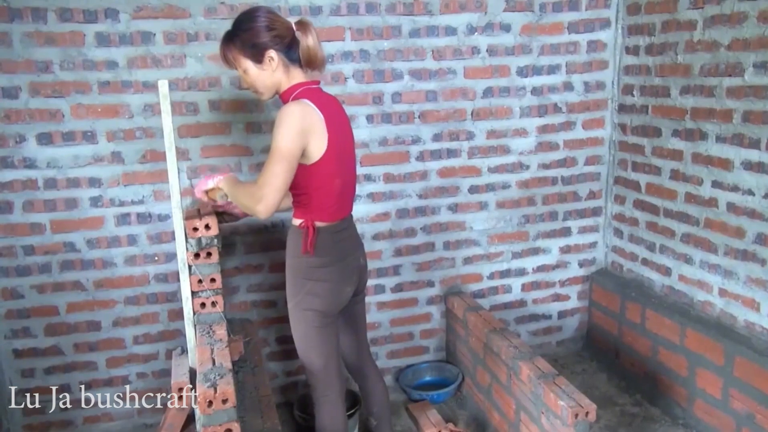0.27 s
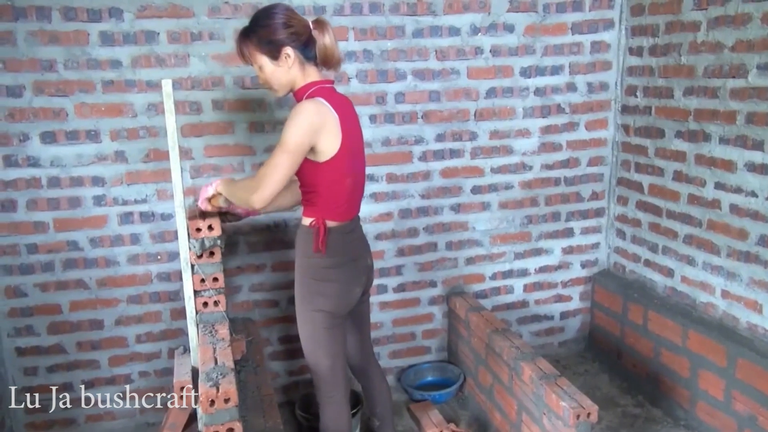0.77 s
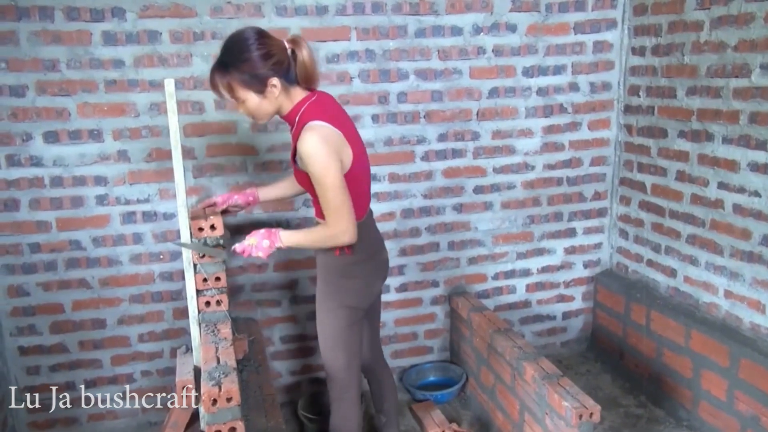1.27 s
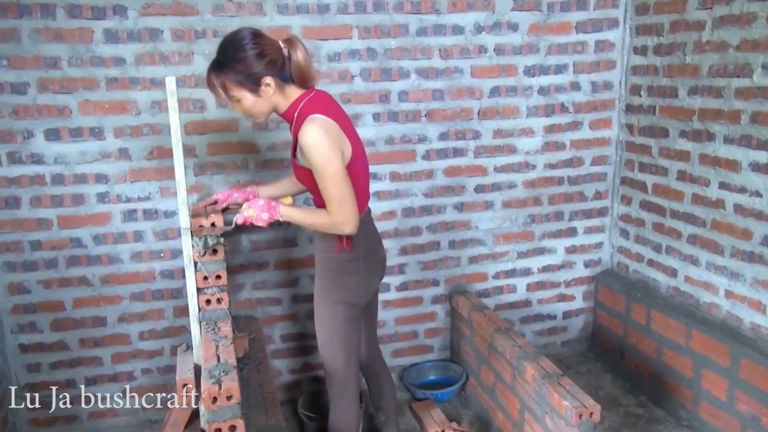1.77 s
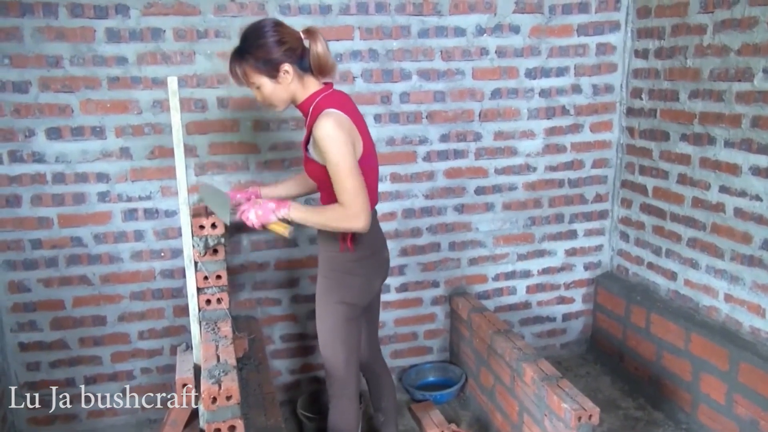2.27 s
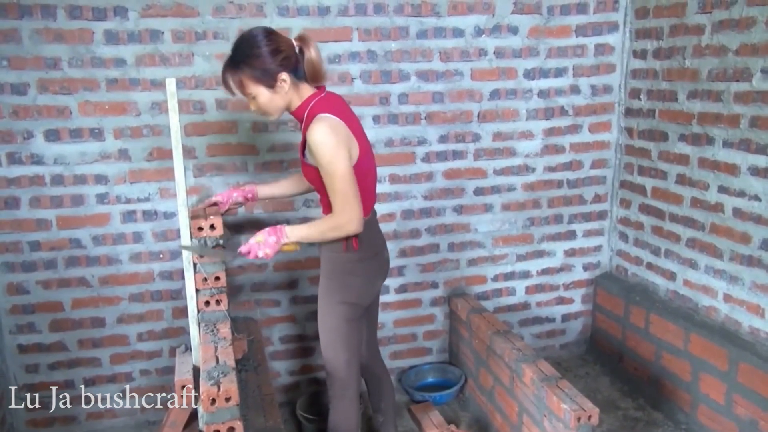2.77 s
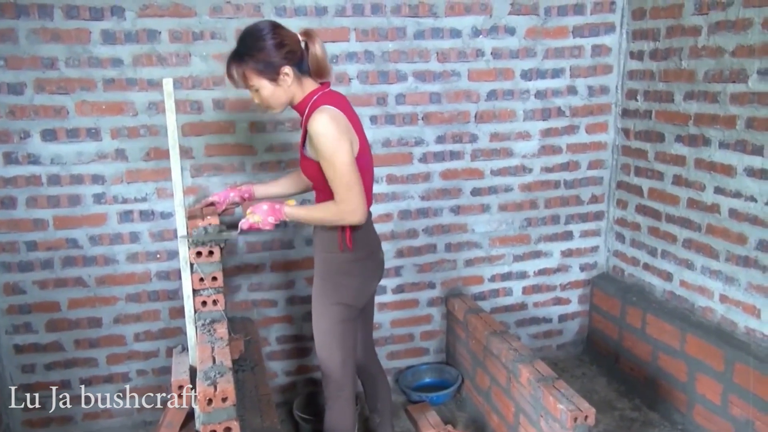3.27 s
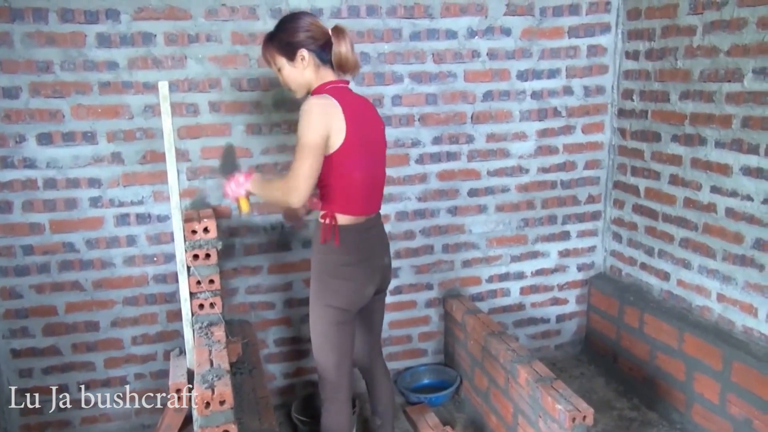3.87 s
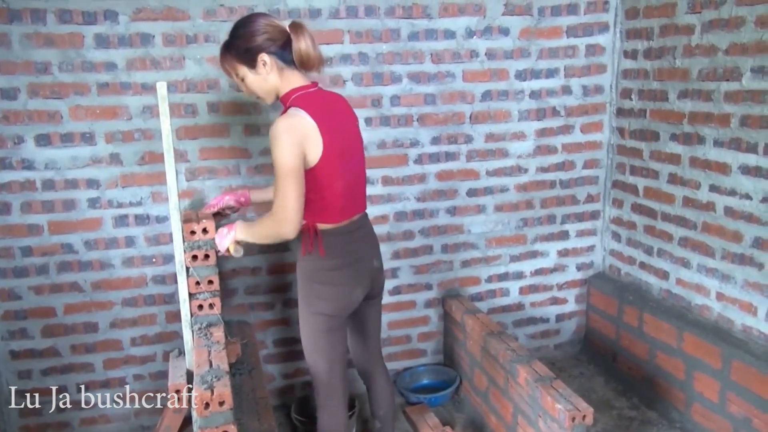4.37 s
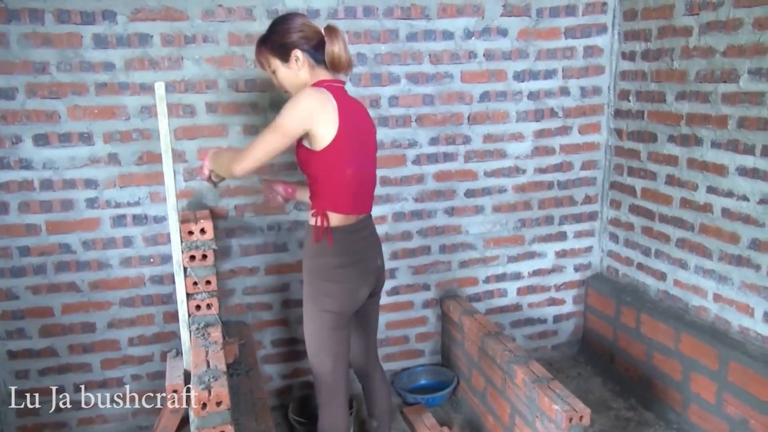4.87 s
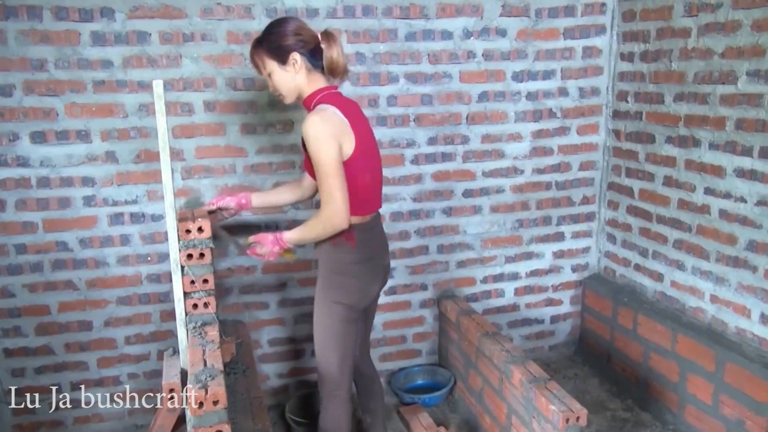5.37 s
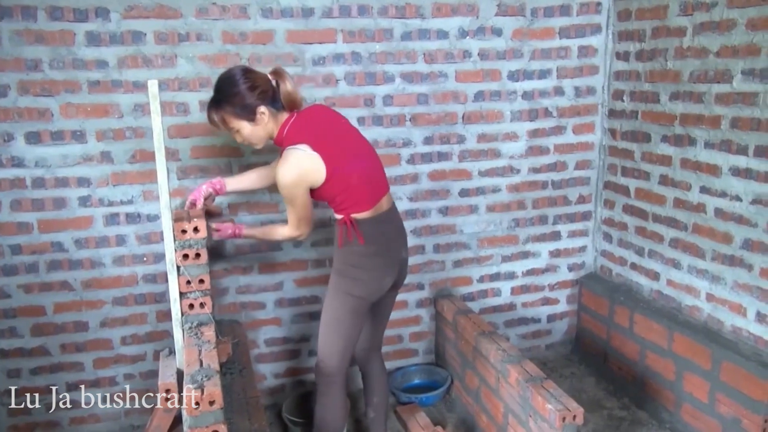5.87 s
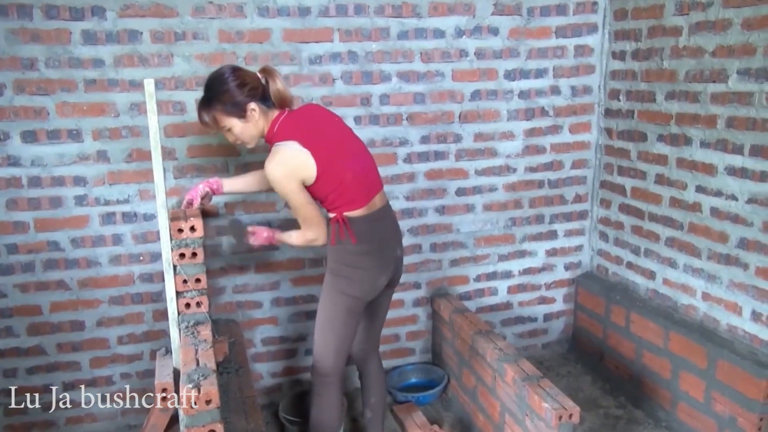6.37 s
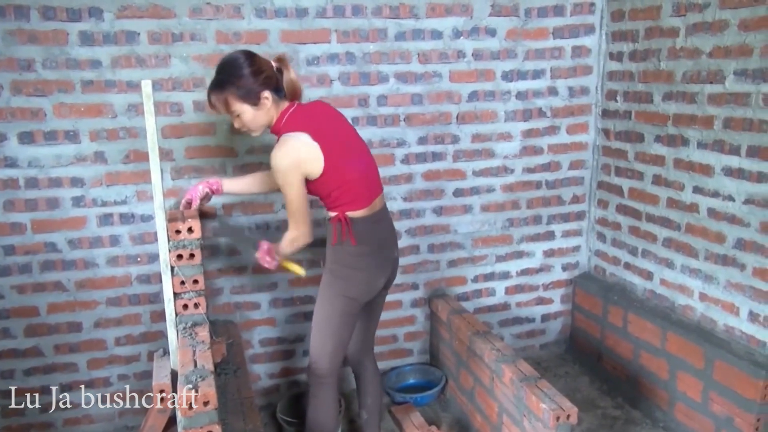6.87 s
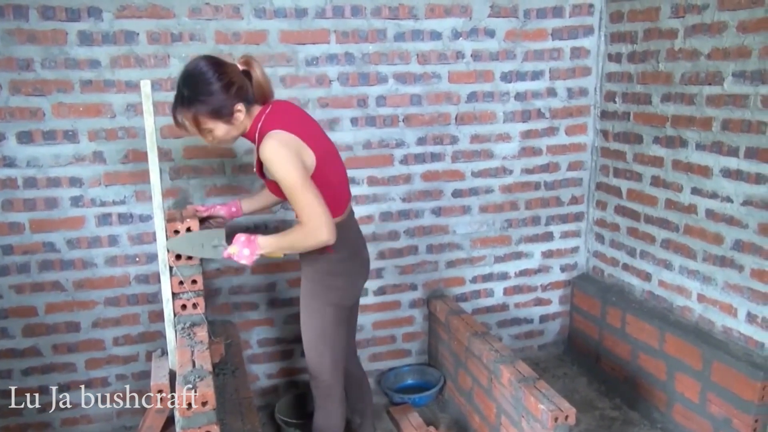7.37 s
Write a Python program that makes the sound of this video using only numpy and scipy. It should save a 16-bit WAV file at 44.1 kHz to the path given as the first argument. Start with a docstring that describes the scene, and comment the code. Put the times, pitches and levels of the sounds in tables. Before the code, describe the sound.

A steel trowel knocks hollow clay bricks with gritty, ringing taps, then scrapes sandy mortar in short strokes over faint, steady cricket trill.

```python
"""A steel trowel is lifting off a scrape, then knocks a hollow clay brick down into its mortar, between bare
brick walls: each blow grinds through grit, lands hard, and rings blade and brick. From 3 s come short scrapes,
where a stream of sand grains excites the same blade, with crumbs ticking and the blade catching once. Near 6 s
the scrapes press harder, catch four times and squeak in stick-slip bands while the blade sings; the last
touches and strokes then thin out. Throughout, crickets trill as modulated noise bands over quiet, coloured
outdoor noise."""
import sys
import numpy as np
from scipy import signal
from scipy.fft import rfft, irfft
from scipy.io import wavfile
from scipy.ndimage import uniform_filter1d

SR = 44100
rng = np.random.default_rng(int(sys.argv[2]) if len(sys.argv) > 2 else 0)


def unload_wav(signal):
    """Save mono or channel-first audio to the path in sys.argv[1] as 16-bit WAV at rate SR, clipped to [-1, 1]."""
    wavfile.write(
        sys.argv[1],
        SR,
        np.round(np.clip(np.atleast_2d(signal).T, -1, 1) * 32767).astype(np.int16),
    )


N = 336483
TIME = np.arange(N) / SR
RING_SIZE = SR // 3  # samples in a contact or impulse response


def undb(db):
    """Decibels to gain."""
    return 10 ** (np.asarray(db) / 20)


def unit(x):
    """Scale to energy 1."""
    return x / np.sqrt(np.sum(x ** 2))


def steady(x):
    """Scale to standard deviation 1."""
    return x / np.std(x)


def lookup(points, hz):
    """Interpolate (Hz, value) points on a log-frequency axis."""
    point_hz, value = np.transpose(points)
    return np.interp(np.log(np.maximum(hz, 1)), np.log(point_hz), value)


def band(x, lo_hz, hi_hz, order=3):
    """Causal Butterworth band-pass."""
    edges_hz = [lo_hz, min(hi_hz, SR / 2 - 100)]
    return signal.sosfilt(signal.butter(order, edges_hz, "band", fs=SR, output="sos"), x)


def through(x, response):
    """Convolve with an impulse response, keeping the length of x."""
    return signal.fftconvolve(x, response)[:len(x)]


def colour(points, size=2048):
    """Minimum-phase impulse response of a spectrum, by folding its cepstrum."""
    bin_hz = np.arange(size // 2 + 1) * SR / size
    cepstrum = irfft(np.log(undb(lookup(points, bin_hz))))
    cepstrum[1:size // 2] *= 2
    cepstrum[size // 2 + 1:] = 0
    return unit(irfft(np.exp(rfft(cepstrum))))


def ring(modes, scatter_db, detune):
    """Decaying modes; strengths and pitches can scatter with the point of contact."""
    t = TIME[:RING_SIZE]
    out = 0
    draws = rng.standard_normal((len(modes), 3))
    for (pitch_hz, level_db, t60_s), (strength, shift, sign) in zip(modes, draws):
        wave = np.sign(sign) * np.sin(2 * np.pi * pitch_hz * (1 + detune * shift) * t)
        decay = np.exp(-np.log(1000) * t / t60_s)
        out = out + undb(level_db + scatter_db * strength) * unit(wave * decay)
    return unit(out)


def walk(rate_hz):
    """Smooth random wander with spread 1."""
    step = max(int(SR / rate_hz), 1)
    held = np.repeat(rng.standard_normal(N // step + 1), step)
    return steady(uniform_filter1d(held, step)[:N])


def grit(n, rate_hz, spread_db):
    """Sand grains cracking: random clicks, most small and a few large."""
    size = undb(spread_db * np.minimum(rng.exponential(size=n), 4))
    cracks = rng.random(n) < rate_hz / SR
    return steady(cracks * rng.choice([-1, 1], n) * size)


def add(out, s, x):
    """Mix x in at time s."""
    i = max(int(s * SR), 0)
    out[i:i + len(x)] += x[:len(out) - i]


def spread(voices, side_db):
    """Two unrelated sounds as middle and side of a wide source."""
    mid, side = voices
    return mid + undb(side_db) * np.array([side, -side])


def contact(lead_s, bite_s, settle_s, hard_db):
    """Force of one contact: grinding swells as the steel bites, it lands hard, the grit settles."""
    t = TIME[:RING_SIZE] - lead_s
    grinding = grit(len(t), 12000, 2.1) * np.exp(np.minimum(t / bite_s, -t / settle_s))
    landing = grit(len(t), 15000, 0.94) * (t >= 0) * np.exp(-np.abs(t) / 0.0014)
    return unit(unit(grinding) + undb(hard_db) * unit(landing))


# trowel blows, and from 4.9 s the scraping blade catching, played the same way: landing_s, body_db, clack_db,
# grit_db, grit_edge_hz, pressed_blade_hz (before detuning), # blade_db (relative, before a common trim),
# hard_db (landing re grinding), brick_db, free_db (before band-pass)
TROWEL_BLOWS = [(0.076, -39, -18, -27, 8000, 2740, 3.5, -2, -41, -47),
                (0.46, -35, -20.5, -27, 9000, 2805, -1.5, -20, -40, -29),
                (0.598, -31.5, -21, -27, 9000, 2520, -18, -3.5, -39, -33),
                (0.743, -34, -20.5, -27, 8750, 2840, -1.5, -12, -40, -36),
                (1.015, -34, -23, -27, 17000, 2750, 0.5, -12, -42, -34),
                (1.12, -34.5, -23, -30.5, 17000, 2610, -4, 4, -32, -29.5),
                (1.782, -41, -27.5, -30, 12000, 2006, 1.5, -8, -46, -33),
                (1.899, -34.5, -21, -29, 11000, 1400, -6.5, -8, -41, -45),
                (2.045, -40.5, -22.5, -26, 9700, 1440, -8, -3.5, -41, -48),
                (2.223, -35.5, -24, -29.5, 10200, 1980, 2.5, -3, -34, -56),
                (2.763, -31, -22.5, -30, 14200, 1967, 0, -3.5, -36, -32),
                (2.88, -35, -23, -28, 15000, 3606, -2, -6.5, -22, -31.5),
                (4.913, -44.5, -34, -34.5, 15000, 1800, -1.5, -11.5, -58, -66),
                (6.182, -49, -27, -19.5, 10800, 2420, 8.5, -27, -50, -56),
                (6.248, -51, -28, -21.5, 13000, 3069, 7, -8, -57, -47),
                (6.488, -53, -25.5, -25, 14000, 1396, 0, -14, -48, -35),
                (6.526, -44, -33, -34.5, 14000, 1345, 9, -3, -56, -26)]
# spectrum of the clack: freq_hz, density_db (per Hz, relative)
CLACK_SPECTRUM = [(40, -39), (100, -27), (170, -18), (240, -6), (310, -3.5), (480, -9.5), (800, -2.5),
                  (1000, -9.5), (1420, -0.5), (1800, -8), (2750, -2.5), (4300, -14), (11000, -21),
                  (15000, -29)]
# steel blade modes, also used by scraping: pitch_hz, level_db (relative), t60_s
BLADE_MODES = [(1339, 9, 0.15), (1429.6, -4.5, 0.41), (1582, 3, 0.16), (1911, 8, 0.052), (2392, -11, 0.097),
               (2454, 8, 0.038), (2540, -20, 0.094), (2774, 2, 0.051), (3117, 4, 0.039), (3240, 0, 0.082),
               (3525, 7, 0.037), (3990, -3.5, 0.034), (4700, -11, 0.06), (4900, 3, 0.02), (5300, 0, 0.037),
               (6130, 0, 0.065), (6600, -1.5, 0.079), (8200, -16.5, 0.054), (8200, -15, 0.175),
               (10000, 2, 0.05), (12000, -4, 0.03), (12400, -2, 0.052)]
# hollow brick modes: pitch_hz (before detuning), level_db (relative, before scatter), t60_s
BRICK_MODES = [(281.5, -3.5, 0.13), (437, 1, 0.061), (685, 1.5, 0.062), (760, -10, 0.05), (800, 7.5, 0.057),
               (1094, 5.5, 0.088), (1216, -3, 0.11), (1340, -31, .08), (1760, -16, 0.13), (2918, -13, 0.25),
               (3280, -3, .09), (3660, -3.5, 0.12)]
# close partials of the pressed blade's note: pitch_ratio [multiple], level_db (relative), t60_s
PRESSED_PARTIALS = [(.92, -10, 0.042), (1, 0.5, 0.041), (1.06, -12.5, 0.039)]
FREE_HZ, FREE_T60_S = 1364, 0.18  # lowest mode of the lifted blade, before detuning
BODY_TOP_HZ, GRIT_BOTTOM_HZ = 950, 4000  # borders of body, clack and grit
BLOW_S = 0.018  # levels are rms over this length
# softer contacts grind for longer before landing
BITE_S, BITE_S_PER_DB, BITE_MIN_S = 0.0076, 0.00011, 0.002


def blows():
    """Trowel on brick: contact force through a gritty clack and steel, then ringing clay and blade."""
    clacks, rings = np.zeros(N), np.zeros(N)
    clack = colour(CLACK_SPECTRUM)
    steel = ring(BLADE_MODES, 0, 0)
    lead_s = 0.05
    for (landing_s, body_db, clack_db, grit_db, grit_edge_hz, pressed_hz,
         blade_db, hard_db, brick_db, free_db) in TROWEL_BLOWS:
        bite_s = max(BITE_S - BITE_S_PER_DB * hard_db, BITE_MIN_S)
        force = contact(lead_s, bite_s, 0.0057, hard_db)
        x = unit(through(force, clack)) + undb(-7.5) * unit(through(force, steel))
        # pressed on the brick, the blade has a damped note set by the point of contact
        partials = [(pressed_hz * ratio, db, t60_s) for ratio, db, t60_s in PRESSED_PARTIALS]
        note = ring(partials, 0.58, 0.0035)
        x = x + undb(blade_db - 4.0) * unit(through(force, note))
        body = undb(body_db) * unit(band(x, 49, BODY_TOP_HZ))
        middle = undb(clack_db) * unit(band(x, BODY_TOP_HZ, GRIT_BOTTOM_HZ))
        top = band(x, GRIT_BOTTOM_HZ, SR / 2)
        top = band(top, BODY_TOP_HZ, max(grit_edge_hz, GRIT_BOTTOM_HZ), order=1)
        add(clacks, landing_s - lead_s, body + middle + undb(grit_db) * unit(top))
        clay = undb(brick_db) * ring(BRICK_MODES, 0.6, 0.0018)
        # once lifted, the blade rings on in its lowest mode
        free = undb(free_db) * ring([(FREE_HZ, 0, FREE_T60_S)], 0, 0.017)
        add(rings, landing_s, band(clay + free, 296, 6100, order=5))  # the rings carry no bass
    return np.sqrt(BLOW_S * SR) * np.array([clacks, rings])


STROKE_ATTACK_S, STROKE_RELEASE_S = 0.016, 0.017  # time constants of bite and lift


def pressure(start_s, end_s, opening_db, closing_db):
    """One stroke: the blade bites, the hand leans in or eases off evenly in dB, the blade lifts."""
    lean_db = np.interp(TIME, [start_s, max(end_s, start_s + .001)], [opening_db, closing_db])
    outside = np.maximum((start_s - TIME) / STROKE_ATTACK_S, (TIME - end_s) / STROKE_RELEASE_S)
    return undb(lean_db) * np.exp(-np.clip(outside, 0, 20))


# scraping strokes: start_s, end_s, opening_db, closing_db (gains before pressure waver),
# hiss_db (sand, relative gain), rumble_db (mortar, relative gain)
SCRAPE_STROKES = [(0.0, 0, -37, -41.5, -5, 2.5), (3.17, 3.37, -56, -59, -0.5, -6),
                  (3.394, 3.51, -56.5, -45.5, 2, -6.5), (4.307, 4.367, -52.5, -61, 0.5, -7.5),
                  (4.396, 4.496, -45, -60, 0, -11), (4.555, 4.68, -55, -64.5, 0, -3.5),
                  (4.722, 4.91, -60.5, -43, -1, -7), (5.854, 5.90, -43.5, -45, 0, -10.5),
                  (5.959, 6.056, -37, -40, -3, -10), (6.127, 6.276, -35, -33.5, 1, -13.5),
                  (6.309, 6.40, -44, -48, -3, -7), (6.424, 6.51, -38.5, -32, -3, -6.5),
                  (6.772, 6.89, -41, -42, -0.5, -10.5), (6.938, 7.095, -44.5, -41.5, 0.5, -8),
                  (7.291, 7.347, -47, -49, -7.5, -10), (7.424, 7.568, -54.5, -62.5, -3, -3)]
# spectrum of sandy mortar, also used by ticks: freq_hz, density_db (per Hz, relative)
SAND_SPECTRUM = [(24, -82), (40, -24), (174, -18.5), (301, -12), (449, -15.5), (1080, -12), (1380, -6),
                 (2010, -7), (2450, -8.5), (3060, -10), (3840, -9), (5170, -10), (7340, -12),
                 (11800, -14.5), (15500, -22)]
WAVER_DB, WAVER_HZ = 1.5, 25.15  # the hand's pressure wavers


def scraping():
    """Blade dragged over sandy mortar, catching and slipping; the grains ring the steel."""
    grains = grit(N, 3000, 3.5) * undb(2.6 * walk(110))
    sand = steady(through(grains, colour(SAND_SPECTRUM)))
    steel = steady(through(grains, ring(BLADE_MODES, 0, 0)))
    rasp = undb(0.5) * steady(band(sand + undb(-9) * steel, 1280, 5240))
    hiss = undb(-0.5) * steady(band(sand + steel / 2, 4320, 16200))
    rumble = undb(1.0) * steady(band(sand, 111, 1244, order=2))
    out = np.zeros(N)
    for start_s, end_s, opening_db, closing_db, hiss_db, rumble_db in SCRAPE_STROKES:
        mix = rasp + undb(hiss_db) * hiss + undb(rumble_db) * rumble
        out += pressure(start_s, end_s, opening_db, closing_db) * mix
    return out * undb(WAVER_DB * walk(WAVER_HZ))


# squeaks, where friction locks onto a blade resonance, and the blade singing in its lowest mode near 1350 Hz: #
# middle_s, length_s, pitch_hz, width_hz, level_db (relative, before a common trim and flutter)
NARROW_TONES = [(.008, 0.065, 1350, 28, -44), (3.515, 0.057, 1410, 110, -49), (4.355, 0.2, 1365, 65, -55),
                (5.878, .07, 2000, 300, -49), (5.996, 0.13, 1550, 547, -34), (6.01, 0.12, 2370, 540, -38),
                (6.093, 0.1, 3210, 300, -35), (6.108, 0.18, 5060, 260, -38.5), (6.151, .2, 2370, 300, -37.5),
                (6.167, 0.091, 3140, 500, -28), (6.465, .1, 1427, 237, -32.5),
                (7.089, 0.09, 1350, 54.7, -39)]


def squeaks():
    """Rough stick-slip tones and the singing blade: narrow noise bands that swell and fade."""
    out = np.zeros(N)
    slips = undb(2 * walk(150))
    for middle_s, length_s, pitch_hz, width_hz, level_db in NARROW_TONES:
        swell = np.hanning(max(int(length_s * SR), 64))
        noise = rng.standard_normal(SR)
        tone = band(noise, pitch_hz - width_hz / 2, pitch_hz + width_hz / 2, order=2)[-len(swell):]
        early = max(int((length_s / 2 - middle_s) * SR), 0)  # samples before time zero
        add(out, middle_s - length_s / 2, undb(level_db - 5) * steady(tone * swell)[early:])
    return out * slips


# crumbs and light blade touches: landing_s, level_db (relative, before a common gain),
# low_db (low knock re the band above 2 kHz)
CRUMB_TICKS = [(1.329, -44, -5), (1.518, -40.5, 1), (3.067, -30, -4), (3.257, -35.5, 0.5), (3.51, -31.5, 2),
               (3.645, -40.5, -7), (3.676, -38, -10), (3.758, -39, 2), (4.001, -41.5, -6),
               (4.042, -28.5, -3), (5.03, -38.5, 0), (5.084, -39.5, -6), (5.118, -41, -4), (5.199, -36, -6),
               (5.239, -31.5, -6), (5.35, -38.5, -4), (5.727, -37, 0), (6.757, -23.5, -3.5),
               (6.935, -23, -5.5), (7.296, -39, 9)]


def ticks():
    """Mortar crumbs and light blade touches: soft gritty contacts coloured as sand."""
    out = np.zeros(N)
    sand = colour(SAND_SPECTRUM)
    lead_s = 0.02
    for landing_s, level_db, low_db in CRUMB_TICKS:
        x = through(contact(lead_s, 0.0095, 0.013, -8), sand)
        high = unit(band(x, 2050, 18000, order=2))
        low = undb(low_db) * unit(band(x, 84, 1930))
        add(out, landing_s - lead_s, undb(level_db + 15.5) * unit(high + low))
    return out


# decay of the brick enclosure: freq_hz, t60_s
WALL_DECAY = [(100, 0.48), (260, 0.2), (700, .2), (1840, 0.18), (4850, 0.12), (13000, 0.15)]


def enclosure(x, wet_db, side_db, first_s):
    """Close brick walls: short, dense reverberation of decaying noise bands, partly different per ear."""
    t = TIME[:RING_SIZE]
    edges_hz = np.geomspace(40, 18000, 10)
    noise = rng.standard_normal((2, len(t)))
    tail = 0
    for lo_hz, hi_hz in zip(edges_hz, edges_hz[1:]):
        sos = signal.butter(3, [lo_hz, hi_hz], "band", fs=SR, output="sos")
        t60_s = lookup(WALL_DECAY, np.sqrt(lo_hz * hi_hz))
        tail = tail + signal.sosfiltfilt(sos, noise) * np.exp(-np.log(1000) * t / t60_s)
    tail = tail * np.clip(t / first_s - 1, 0, 1)  # silent until first_s, full at twice that
    mid, side = (through(x, undb(wet_db) * unit(r)) for r in tail)
    return (x + spread((mid, side), side_db)) / np.sqrt(1 + undb(2 * wet_db))


# crickets: pitch_hz, width_hz, level_db (middle voice, before swell), trill_hz (mean rate)
CRICKET_BANDS = [(4570, 420, -63.5, 30), (7680, 1160, -65.5, 54)]
SWELL_DB, SWELL_HZ = 0.04, 1.07  # very slight, slow wander of the chorus


def crickets():
    """Many distant crickets merge into narrow noise bands, trilled by amplitude modulation."""
    out = 0
    for pitch_hz, width_hz, level_db, trill_hz in CRICKET_BANDS:
        rate_hz = trill_hz * (1 + .1 * walk(8.1))
        trill = 1 + 0.12 * np.sin(2 * np.pi * np.cumsum(rate_hz) / SR)
        voices = []
        for _ in range(2):
            noise = rng.standard_normal(N)
            chirr = band(noise, pitch_hz - width_hz / 2, pitch_hz + width_hz / 2, order=2)
            voices.append(steady(chirr * trill * undb(1.5 * walk(24))))
        out = out + undb(level_db) * spread(voices, -3.5)
    return out * undb(SWELL_DB * walk(SWELL_HZ))


# outdoor background spectrum: freq_hz, density_db (per Hz, relative)
AIR_SPECTRUM = [(25, -28), (50, -14), (100, -11.5), (135, -3), (253, -8), (378, -1), (598, -3.5),
                (1080, -15.5), (1240, -24), (1380, -10.5), (1570, -11.5), (3200, -11), (3930, -12.5),
                (4750, -28), (5280, -11.5), (7910, -16.5), (15500, -21)]
# resonances of the space between the walls: pitch_hz, level_db (relative), t60_s
HOLLOW_MODES = [(151.6, -7.5, 0.16), (379, -4.5, 0.22), (771, 3.5, 0.048), (1072, 3, 0.016),
                (1305, -2.5, 0.038)]
AIR_GAIN_DB = -62.5


def air():
    """Quiet outdoor noise plus noise coloured by the hollow between the walls."""
    voices = []
    for noise in rng.standard_normal((2, N)):
        outdoors = steady(through(noise, colour(AIR_SPECTRUM)))
        # reversed noise decorrelates the two layers
        hollow = through(noise[::-1], ring(HOLLOW_MODES, 0, 0))
        x = outdoors + undb(-2.5) * steady(band(hollow, 108, 6000, order=2))
        voices.append(x * undb(0.74 * walk(3.735)))
    return undb(AIR_GAIN_DB) * spread(voices, -0.7)


def scene():
    """Trowel work between the walls, over the outdoor background."""
    clacks, rings = blows()
    knocks = enclosure(clacks, wet_db=-2, side_db=-3, first_s=0.0015)
    scrapes = enclosure(scraping() + ticks(), wet_db=-5, side_db=-0.5, first_s=0.002)
    tones = enclosure(rings + squeaks(), wet_db=-8.0, side_db=0, first_s=0.0051)
    return knocks + scrapes + tones + crickets() + air()


TOP_HZ, CEILING = 15400, 0.36  # CEILING: limit before the low-pass


def record(dry):
    """Round the loudest peaks with tanh, then cut the top with a steep elliptic low-pass."""
    rounded = CEILING * np.tanh(dry / CEILING)
    return signal.sosfilt(signal.ellip(10, .2, 80, TOP_HZ, fs=SR, output="sos"), rounded)


dry = scene()
out = record(dry)
unload_wav(out)
```